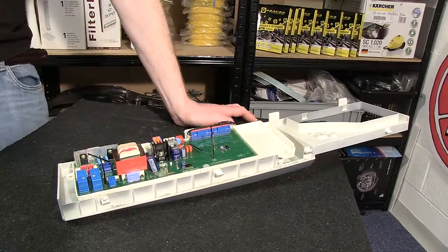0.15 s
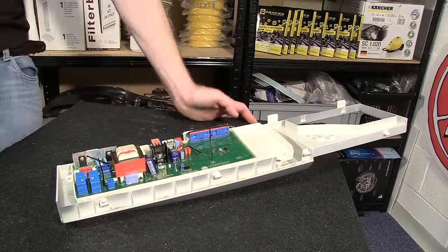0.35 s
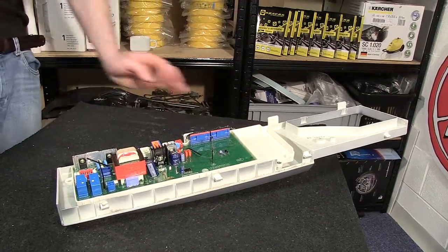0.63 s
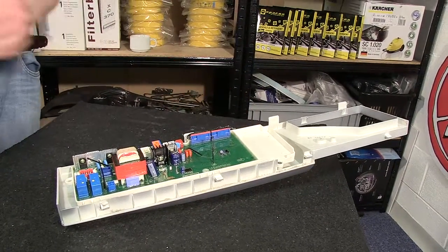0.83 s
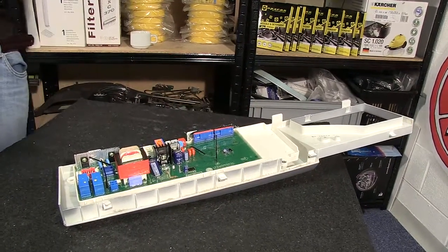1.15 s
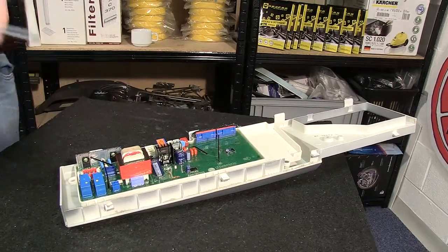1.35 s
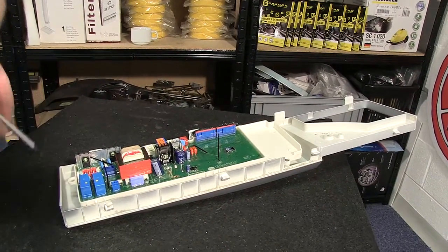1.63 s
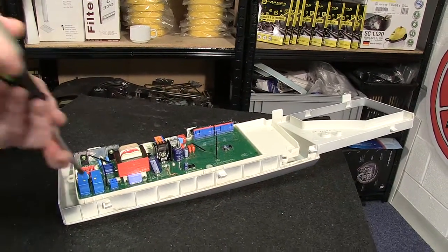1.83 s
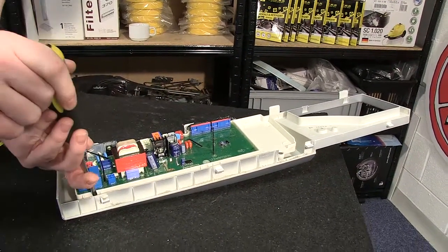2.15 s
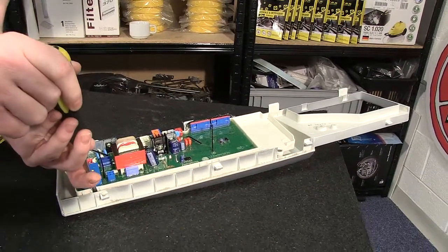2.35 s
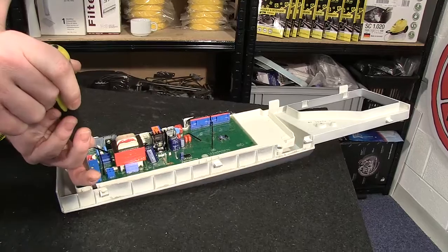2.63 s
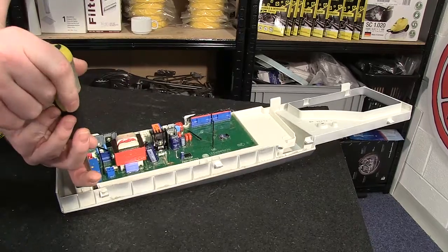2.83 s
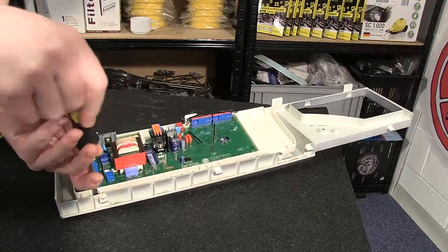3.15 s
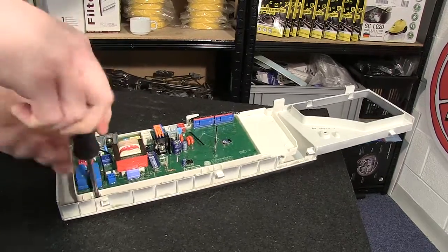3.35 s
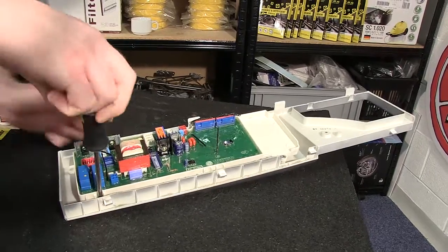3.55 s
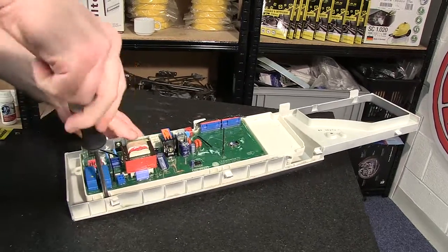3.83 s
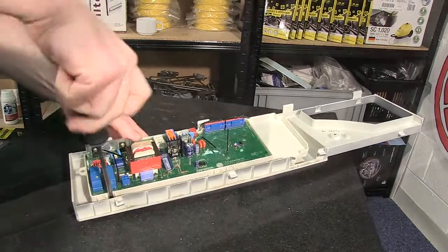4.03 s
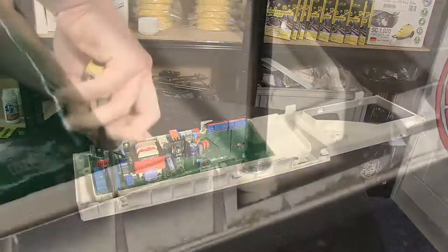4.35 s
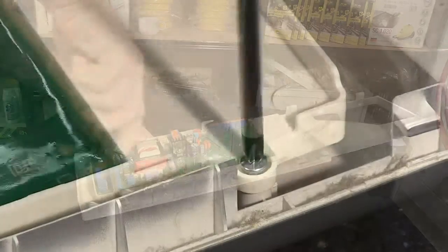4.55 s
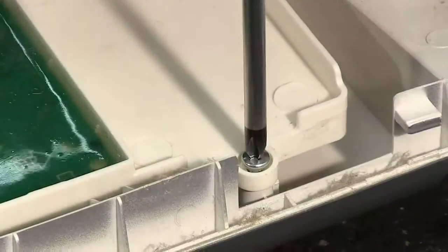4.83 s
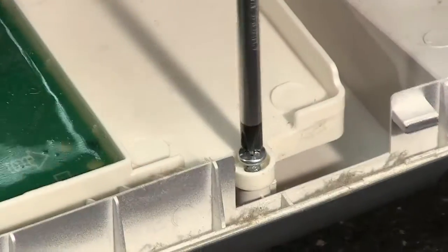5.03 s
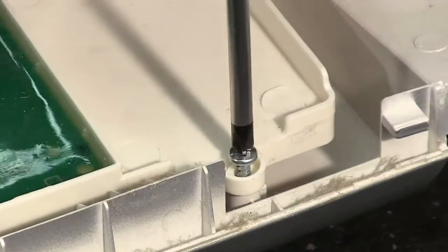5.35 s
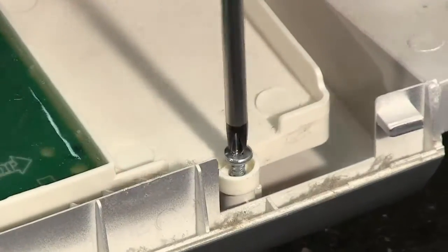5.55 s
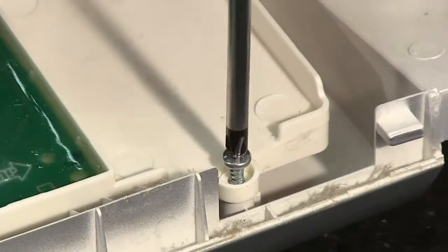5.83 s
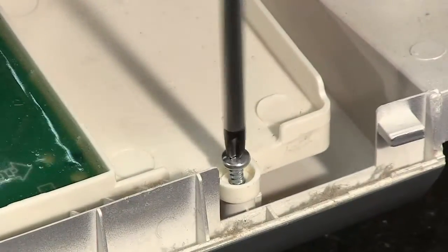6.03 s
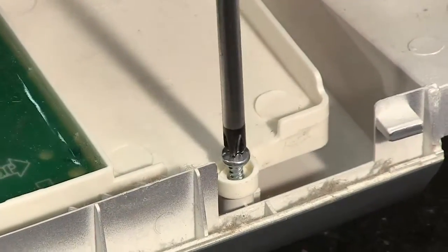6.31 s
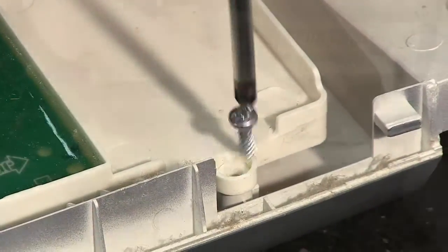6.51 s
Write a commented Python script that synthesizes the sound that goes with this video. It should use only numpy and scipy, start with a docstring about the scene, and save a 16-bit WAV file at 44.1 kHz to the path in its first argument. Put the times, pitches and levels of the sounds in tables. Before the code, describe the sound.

Close in a small, slightly live room with soft hiss, faint hum and floor rumble. Hands brush a plastic tray and leave with dull taps and a cloth swish. After a quiet gap, a screwdriver lands with hard bright knocks, then small slips and ticks, a dry snap and a heavier tap. Fine irregular clicks follow, ending in two knocks and light metallic clinks.

```python
"""A padded bench in a store room, heard close: a screwdriver turns small steel screws out of a long plastic tray.
Hiss, hum and floor rumble run throughout; hands rub and scuff, then light slips, dry pulses and swishes come.
Hard knocks and clinks at 2.4 s lead to busy slips, a snap at 3.7 s and a heavy tap at 4.1 s; more end it at 6-6.7 s.
Blows stir damped modes of bench, hollow tray, ribs, board and steel tip; grainy noise stirs tray and board
in rubs and scuffs, thin sine tones swell between, and noise tails give the room's answer."""
import sys
import numpy as np
from scipy import signal
from scipy.fft import rfft, irfft, next_fast_len
from scipy.io import wavfile
from scipy.ndimage import map_coordinates

SR = 44100
rng = np.random.default_rng(int(sys.argv[2]) if len(sys.argv) > 2 else 0)


def inscribe(sig):
    """Save sig as 16-bit PCM at rate SR to the path in sys.argv[1].

    A 1-D sig is mono; a 2-D sig holds one channel per row.
    Samples are clipped to [-1, 1] before scaling.
    """
    pcm = np.round(np.clip(np.atleast_2d(sig).T, -1, 1) * 32767)
    wavfile.write(sys.argv[1], SR, pcm.astype(np.int16))


N = 294588

# In the tables, levels are relative settings: the functions below add a trim where they use them.
# contacts of tool and tray: t/s, ribs level/dB, then hollow body, board and steel tip level/dB re ribs
CONTACTS = [(0.427, -48.5, -17, 0, -23), (0.516, -38.5, 9.5, -15, -19), (0.548, -48, 14, -7, -20),
            (0.58, -54, 16, -20, -25), (0.626, -43, -22, -40, -27), (0.641, -51, -8, -22, -25),
            (0.656, -62, -10, -13, -15), (0.723, -46.5, -8, -2, -13), (1.084, -41, 0, -22, -24),
            (1.102, -40, -20, -15, -22), (2.423, -24.5, -14, 3, -20), (2.427, -26.5, -15, -2, -21),
            (2.452, -28, -5.5, -4, -26), (2.673, -37, -20, -7, -23), (2.677, -31, -10, -4, -20),
            (2.682, -31.5, -7, -3, -16), (2.689, -25.5, -28, 1, -8.5), (2.711, -31.5, -5, -4.5, -25),
            (2.898, -57, -6, 2, 5), (2.913, -47, 9.5, -6, -18), (2.937, -37.5, 5, -13, -30),
            (2.952, -43.5, -7, -5, -25), (3.073, -56, 8, -16, -15), (3.102, -41, 4, -13, -27),
            (3.349, -57, 15, -13, 0), (3.391, -50, -7, -22, -19), (3.507, -49.5, -27, 1.5, -23),
            (3.609, -41, 0, -13, -17), (3.656, -51.5, 23, -27, -25), (3.664, -48, 22, -31, -29),
            (3.69, -53, -13, -6, -12), (3.749, -43, 2, -19, -26), (3.806, -43.5, 2.5, -5, 0),
            (3.976, -40, -3, -9.5, -13), (4.001, -32.5, -4, -13.5, -22), (4.012, -28, -2, -8, -15.5),
            (4.03, -39, 0, -18, -25), (4.0905, -21.5, -7, -15, -45), (4.145, -62, 7, -9, -17),
            (4.351, -47.5, 15, -14, -18), (4.484, -35, -2, -13, -6.5), (4.496, -36, -11, -9, -26),
            (4.547, -51, -16, -7, -23), (4.569, -39, 5, -17, -27), (4.692, -36.5, -14, -2, 5.5),
            (4.728, -37.5, -21, -11.5, -30), (4.864, -40.5, -9, -1.5, 8), (4.907, -36.5, -3, -12, -17),
            (4.923, -44, -9, -5, 0), (4.95, -35.5, -10, -13, -30), (5.045, -40, -8, -4.5, 8),
            (5.077, -50.5, -16, -3.5, -25), (5.128, -41.5, -20, -12, -27), (5.157, -46, -16, -12, -29),
            (5.224, -38, -20, -12, -28), (5.26, -51, -6, -7, -13), (5.278, -42.5, 1.5, -10, -11),
            (5.41, -38, -28, -9, -28), (5.546, -35.5, -18, -14, -32), (5.561, -38.5, 4, -22, -23),
            (5.577, -43, -8, -7, -14), (5.587, -30, 6, -2.5, -10.5), (5.669, -40.5, -3, -6.5, -21),
            (5.779, -55, -11, -20, -28), (5.79, -48, -16, -11, -22), (5.799, -41, -12, -11, -30),
            (6.048, -29, -4, -10, -33), (6.077, -20.5, 0, -13.5, -31), (6.081, -32.5, 7, 3, -9),
            (6.092, -37, -3, 2, -12), (6.138, -54, 15, -15, -20), (6.187, -48.5, -25, -2, -24),
            (6.194, -50, -20, -10, -24), (6.324, -49, 5, -11, -17), (6.372, -30.5, -4.5, -12.5, -19),
            (6.374, -47, -14, -6, -8), (6.409, -54, -21, 12, 9), (6.414, -56, -20, 12, 6),
            (6.422, -50, -18, 2, -8), (6.456, -48.5, -19, 10, -12), (6.469, -54, -24, 17, 10),
            (6.478, -54, -34, 14, -2), (6.517, -36, -13, 4, 5.5), (6.539, -38.5, -2, -4, -22),
            (6.61, -47, -17, -15, -19), (6.634, -44, 0, -6, -12), (6.65, -31, -32, -0.5, 9),
            (6.663, -44, -20, 5, 12)]
# the slips after each blow, one row each for bench, hollow body, ribs, board, tip: level/dB
CHATTER_LEVELS = [
    [-34.5],
    [-32],
    [-24.5],
    [-24],
    [-26],
]
# decay of the crunch, one row each for board and steel tip: t/s
CRUNCH_DECAYS = [
    [.001],
    [0.0046],
]
# damped modes of each struck body: f/Hz, width/Hz, level/dB
BENCH_MODES = [(62, 13, -3.5), (130, 164, -5)]
HOLLOW_MODES = [(203.5, 13.2, 0), (267.5, 27.9, 8.5), (295, 76, -6.5)]
RIB_MODES = [(476, 104, -0.5), (579, 69, 3.5), (786, 244, 1), (1000, 258, 2), (1205, 88, 3.5),
             (1354, 202, -0.5), (1640, 590, -9)]
BOARD_MODES = [(2040, 430, -1.5), (2533, 212, 4.5), (2875, 480, 2), (3680, 980, -1.5), (4126, 420, 0),
               (4690, 420, -4), (5690, 1300, -10)]
TIP_MODES = [(6960, 2400, 1), (8930, 2450, 2), (11060, 1050, 1), (12760, 1200, 1), (14100, 2800, -4.5)]
SCREW_MODES = [(3440, 170, -0.5), (4640, 890, -5.5), (5700, 370, 2), (6260, 330, -10), (6650, 410, -1),
               (7030, 950, -5)]
# broad resonances of sliding cloth: f/Hz, width/Hz, level/dB
SLEEVE_MODES = [(340, 69, 7), (586, 260, -0.5), (776, 290, -1.5)]
# hard knocks, one rib singing out where each lands: t/s, level/dB, f/Hz
RIB_KNOCKS = [(0.428, -40, 610), (2.422, -21.5, 1237), (2.451, -25, 1230), (2.688, -19.5, 1248),
              (2.711, -28, 1000), (3.102, -41, 554), (3.506, -38, 1274), (4.091, -26.5, 602),
              (4.483, -33.5, 900), (4.729, -34.5, 835), (5.408, -39, 940), (5.67, -38, 873),
              (6.047, -31, 457), (6.076, -25.5, 467), (6.37, -32, 1004), (6.54, -32, 1050)]
# the screw clinks in its seat: t/s, level/dB, brightest ring f/Hz
SCREW_CLINKS = [(2.4223, -20, 4640), (2.689, -26, 4250), (2.71, -37, 3900), (2.897, -53, 3270),
                (2.9526, -47, 3250), (4.5461, -45.5, 3220), (5.226, -46, 3160), (5.548, -44, 3700),
                (5.7972, -53, 3440), (6.4074, -32, 3270), (6.4214, -38, 5640), (6.457, -35, 4330),
                (6.4707, -27.5, 4370), (6.481, -29, 4770), (6.5169, -17.5, 6650), (6.6501, -19, 5470)]
# dry pulses that hardly ring, one snap, then thuds through the bench: t/s, level/dB, f/Hz, width/Hz
DRY_PULSES = [(1.0175, -28, 1000, 1120), (1.0879, -33.5, 170, 220), (1.297, -40.5, 390, 250),
              (3.6650, -24.5, 214, 303), (3.690, -38, 130, 110), (3.806, -40, 130, 110),
              (4.02, -45, 59, 30), (4.910, -54, 62, 25), (5.573, -45, 58, 29.8), (6.074, -47, 59.5, 30)]
# short scuffs and creaks: middle t/s, length t/s, grit level/dB,
# place (0 hollow body, 1 ribs, 2 board; in between or beyond allowed), skin hiss level/dB
SCUFF_STROKES = [(0.127, 0.04, -57, 1.13, -86), (0.363, 0.088, -53, 1.56, -68.5),
                 (0.464, 0.17, -57.5, 1, -71), (0.722, 0.14, -54, .8, -71), (1.064, 0.022, -63, .05, -62.5),
                 (1.133, 0.13, -52, 0.75, -66), (1.303, 0.037, -71, .5, -66), (1.574, 0.052, -66, 1.9, -68),
                 (2.93, 0.076, -51.5, 0.2, -69), (2.959, 0.034, -54.5, 1.92, -86),
                 (3.341, 0.084, -51.5, .05, -66), (3.703, 0.13, -51.5, .02, -69),
                 (3.838, 0.078, -50, 0.44, -74), (4.102, 0.065, -60, 2.2, -62.5),
                 (4.346, 0.082, -57.5, 1.02, -67), (4.532, 0.16, -55, 0.91, -71),
                 (4.912, 0.064, -48.5, 0.64, -67), (5.124, .02, -56, 1, -80), (5.22, .04, -58, 1, -80),
                 (5.271, 0.059, -52, 1.1, -67), (5.408, 0.026, -50, 0.68, -82),
                 (5.612, 0.2, -47.5, 0.51, -69), (5.799, 0.027, -48.5, 0.77, -84),
                 (6.027, 0.074, -55, 0.65, -79), (6.048, 0.013, -52, 1.2, -76),
                 (6.09, 0.028, -45, 1.4, -57), (6.397, 0.024, -56, 1.3, -73),
                 (6.427, 0.083, -52.5, 1.5, -83), (6.464, 0.019, -51, 1.4, -78),
                 (6.482, 0.048, -51.5, 1.5, -75)]
# dull swishes as the arms move: middle t/s, length t/s, level/dB
ARM_SWISHES = [(1.164, 0.12, -54), (1.302, 0.033, -57.5), (1.948, 0.46, -58), (2.21, 0.25, -73),
               (3.665, 0.034, -42)]
# faint held tones: middle t/s, length t/s, level/dB, f/Hz
THIN_TONES = [(1.134, 0.046, -53, 730), (1.16, .09, -56, 340), (1.18, .04, -61, 760),
              (2.2, 0.48, -70.5, 598), (2.798, 0.19, -66, 454), (2.998, 0.11, -56.5, 215),
              (4.933, 0.26, -53.5, 61), (5.557, .03, -61, 3600), (6.416, 0.028, -49, 1236),
              (6.459, 0.053, -52.5, 1280)]
# rubbing: t/s, hollow body drag level/dB, rib drag level/dB, skin and cloth rustle level/dB
RUB_LEVELS = [(0.0, -65, -61, -60.5), (0.63, -66, -58.5, -61), (0.76, -68.5, -64.5, -63),
              (1.64, -75, -67.5, -64.5), (1.93, -65, -68, -65), (2.27, -78, -71.5, -72),
              (2.98, -68, -66, -68.5), (3.39, -63, -67.5, -67), (3.89, -55.5, -61.5, -64),
              (4.26, -62.5, -67, -66), (5.0, -64, -64.5, -73), (6.05, -68, -73, -71), (6.23, -57, -70, -81),
              (6.42, -61, -66, -74), (6.55, -60, -64, -61), (6.68, -60, -55, -63)]
# noise colours of rustle, of skin on the tray and of the steady hiss: f/Hz, level/dB per Hz
RUSTLE_SPECTRUM = [(800, -2.5), (2000, -0.5), (4000, -6.5), (8000, -10.5), (12000, -27), (16000, -13.5)]
SKIN_SPECTRUM = [(3000, -6), (5500, 6.5), (8000, 4), (12000, 3), (16000, -12)]
AIR_SPECTRUM = [(72, -4), (100, 6), (200, 1.5), (400, -6), (800, -14), (1600, -22), (3200, -21),
                (6300, -24), (12000, -24.5), (16000, -29)]
# the room's decay: f/Hz, time to fall 60 dB t/s
ROOM_T60 = [(200, 0.27), (1000, 0.32), (2500, 0.26), (6000, 0.19), (16000, 0.15)]
# floor rumble: t/s, level/dB
RUMBLE_LEVELS = [(0.0, -62), (0.05, -55), (0.18, -63), (0.65, -54), (2.16, -65), (3.66, -50.5), (3.93, -59),
                 (4.04, -42.5), (4.17, -58), (4.54, -48.5), (5.14, -60), (5.6, -46), (5.64, -57.5),
                 (6.68, -58)]

BENCH_DB, BENCH_FOLLOWS = -13.5, 0.76  # bench level/dB re ribs; its share of the hollow body's dB
CHATTER_S = 0.0098  # decay of the slips t/s, scaled for each body
REACH_DB = 14  # a body one place from the stroke is this much quieter
TOP_HZ = 15850  # band limit of the microphone feed


def taps():
    """A blow, then uneven slips that swell and die, drive the damped modes of five bodies."""
    force = np.zeros((5, N + SR))
    t = np.arange(SR // 8) / SR
    # the stiffer parts settle sooner than the ribs
    lasting = np.array([[.5], [.8], [1.1], [.9], [.6]])
    blow = np.hanning(24) / np.hanning(24).sum()  # about half a millisecond
    for s, db, hollow_db, board_db, tip_db in CONTACTS:
        unevenness_db = 4.94 * rng.standard_normal(len(t))
        slips = rng.standard_normal(len(t)) * amp(unevenness_db + np.array(CHATTER_LEVELS))
        push = slips * np.exp(-t / (lasting * CHATTER_S)) * (1 - np.exp(-t / 0.00026))
        push[:3, :24] += blow
        # to the stiff board and tip the blow is a tiny crunch, new each time
        crunch = rng.standard_normal(len(t)) * np.exp(-t / np.array(CRUNCH_DECAYS))
        push[3:] += 1.5 * crunch / np.linalg.norm(crunch, axis=1, keepdims=True)
        bench_db = BENCH_DB + BENCH_FOLLOWS * hollow_db
        shares = amp(db + np.array([[bench_db], [hollow_db], [0], [board_db], [tip_db]]))
        force[:, round(s * SR):][:, :len(t)] += shares * push
    modes_of_bodies = (BENCH_MODES, HOLLOW_MODES, RIB_MODES, BOARD_MODES, TIP_MODES)
    trims_db = (-2.0, -7, -2.5, -1, -1.0)
    bodies = zip(force[:, :N], modes_of_bodies, trims_db)
    return sum(amp(db) * struck(f, modes) for f, modes, db in bodies)


def rib_knocks():
    """Under a hard knock one rib sings as a single damped sine."""
    return rings(RIB_KNOCKS, cycles=32.0, level_db=-3.5)


def clinks():
    """The screw rings at its own modes and, briefly, at a listed pitch set by how deep it sits."""
    force = np.zeros(N + SR)
    t = np.arange(SR // 16) / SR
    for s, db, _ in SCREW_CLINKS:
        crunch = rng.standard_normal(len(t)) * np.exp(-t / 0.003)
        force[round(s * SR):][:len(t)] += amp(db - 6.0) * crunch / np.linalg.norm(crunch)
    return struck(force[:N], SCREW_MODES) + rings(SCREW_CLINKS, cycles=52, level_db=-4)


def pulses():
    """An impulse stirs one heavily damped mode, so each pulse hardly rings."""
    return sum(-amp(db) * struck(np.arange(N) == round(s * SR), [(hz, width, 0)])
               for s, db, hz, width in DRY_PULSES)


def scuffs():
    """Each stroke swells and fades, gritty in the tray and board, airy on the skin."""
    strokes = 0
    for s, length, db, place, skin_db in SCUFF_STROKES:
        body_db = db - REACH_DB * np.abs(np.arange(3) - place)
        strokes = strokes + amp([*body_db, skin_db])[:, None] * swell(s, length)
    grit = grains(3.26)
    voices = [unit(struck(grit, modes)) for modes in (HOLLOW_MODES, RIB_MODES, BOARD_MODES)]
    voices.append(noise(SKIN_SPECTRUM, grain_db=1.5))
    return np.sum(strokes * voices, axis=0)


def tones():
    """Thin, slightly wavering sine tones that swell and fade."""
    t = np.arange(N) / SR
    waver = .5 * wobble(30)  # phase in radians, shared by all
    return sum(amp(db + 2.5) * swell(s, length) * np.sin(2 * np.pi * hz * t + waver)
               for s, length, db, hz in THIN_TONES)


def swishes():
    """Cloth slides: grainy noise through broad resonances gives a soft, low colour."""
    envelope = sum(amp(db) * swell(s, length) for s, length, db in ARM_SWISHES)
    return envelope * unit(struck(grains(0.74), SLEEVE_MODES))


def hands():
    """Fingers and thread drag on the tray and stir its modes; skin and sleeve rustle as coloured noise."""
    hollow_db, ribs_db, rustle_db = curves(RUB_LEVELS)
    hollow_drag = amp(hollow_db - 3.5) * unit(struck(grains(4.5), HOLLOW_MODES))
    rib_drag = amp(ribs_db - 5) * unit(struck(grains(3.1), RIB_MODES))
    drag = amp(1.6 * wobble(25)) * (hollow_drag + rib_drag)
    rustle = amp(rustle_db - 3.5 + 0.57 * wobble(29.5)) * noise(RUSTLE_SPECTRUM, grain_db=0.5)
    return drag + rustle


def room(x, count=5):
    """Noise tails decay at each frequency's own speed; several take turns, so the answer keeps changing."""
    hz, t, z = signal.stft(rng.standard_normal((count, SR // 2)), SR, nperseg=256)
    decay = amp(-60 * t / along(ROOM_T60, hz)[:, None])
    tails = signal.istft(z * decay, SR, nperseg=256)[1]
    # the next tail takes over every eighth of a second
    turns = np.arange(N) // (SR // 8) % count == np.arange(count)[:, None]
    delayed = np.pad(x * turns, ((0, 0), (200, 0)))  # the answer starts 4.5 ms late
    answer = signal.fftconvolve(delayed, tails / np.linalg.norm(tails[0]), axes=1)
    return answer.sum(axis=0)[:N]


def background():
    """Steady coloured hiss, a wavering mains hum and noise-driven low modes rumbling through the floor."""
    hum_phase = 2 * np.pi * 100.5 * np.arange(N) / SR + 0.41 * wobble(4.4)
    hum = amp(-66.0 + 0.53 * wobble(2.98)) * np.sin(hum_phase)
    floor = struck(rng.standard_normal(N), [(23.2, 19.6, -1.5), (60.3, 15.6, -4)])
    rumble = amp(curves(RUMBLE_LEVELS)[0]) * unit(floor)
    hiss = amp(-60) * noise(AIR_SPECTRUM, grain_db=0.5)
    return hiss + hum + rumble


def struck(force, modes):
    """A body's damped modes, deaf far above the highest one; a unit impulse peaks at 1."""
    def ring(f):
        peaks = 0
        for k, (center, width, db) in enumerate(modes):
            damping = 1j * f * abs(width)
            # neighbouring modes swing in opposite senses
            peaks = peaks + (-1) ** k * amp(db) * damping / (center * center - f * f + damping)
        return peaks / (1 + 1j * f / (1.94 * modes[-1][0])) ** 2
    return filtered(force, ring) / np.abs(filtered(np.arange(N) == 0, ring)).max()


def rings(rows, cycles, level_db):
    """One damped sine a row, dying by 60 dB in so many cycles."""
    out = np.zeros(N + SR)
    t = np.arange(SR // 8) / SR
    onset = 1 - np.exp(-t / 0.00043)
    for s, db, hz in rows:
        decay = amp(db + level_db - 60 * t * hz / cycles)
        out[round(s * SR):][:len(t)] += decay * np.sin(2 * np.pi * hz * t) * onset
    return out[:N]


def swell(s, length):
    """A half cosine around s."""
    return np.cos(np.pi * np.clip((np.arange(N) / SR - s) / length, -.5, .5))


def grains(grain_db):
    """White noise that comes in uneven scratches."""
    return amp(grain_db * wobble(300)) * rng.standard_normal(N)


def noise(spectrum, grain_db):
    """Coloured noise of rms 1."""
    return unit(filtered(grains(grain_db), lambda hz: amp(along(spectrum, hz))))


def wobble(rate):
    """A smooth random curve, rate knots a second."""
    knots = rng.standard_normal(int(N * rate / SR) + 4)
    return map_coordinates(knots, [np.arange(N) * rate / SR])


def curves(rows):
    """One value per sample for each column after the time."""
    s, *cols = np.transpose(rows)
    return [np.interp(np.arange(N) / SR, s, c) for c in cols]


def along(points, hz):
    """Value at hz from (f/Hz, value) points on a log axis."""
    f, v = np.transpose(points)
    return np.interp(np.log(hz + 1), np.log(f + 1), v)


def filtered(x, response):
    """x with its spectrum multiplied by a complex response of frequency."""
    m = next_fast_len(N + SR // 2)
    return irfft(rfft(x, m) * response(np.fft.rfftfreq(m, 1 / SR)), m)[:N]


def unit(x):
    """x at rms 1."""
    return x / np.sqrt(np.mean(x ** 2) + 1e-20)


def amp(db):
    """dB to gain."""
    return 10 ** (np.asarray(db) / 20)


def scene():
    """Close work on the bench with the room's answer; pulses, hands and background come without it."""
    near = taps() + rib_knocks() + clinks() + scuffs() + swishes() + tones()
    return (near + amp(-13) * room(near) + pulses() + hands() + background())[None]


def record(dry):
    """The microphone feed keeps nothing above its band limit."""
    return filtered(dry[0], lambda hz: hz < TOP_HZ)[None]


dry = scene()
out = record(dry)
inscribe(out)
```